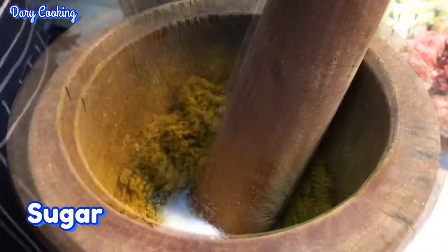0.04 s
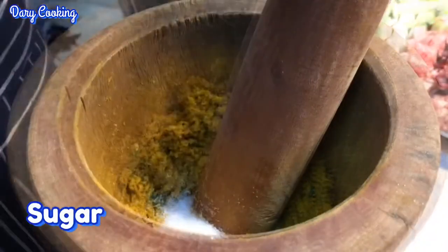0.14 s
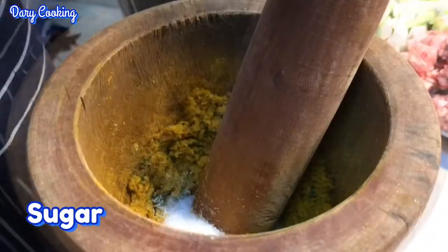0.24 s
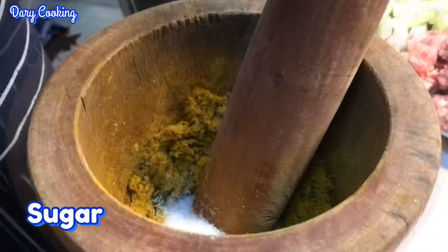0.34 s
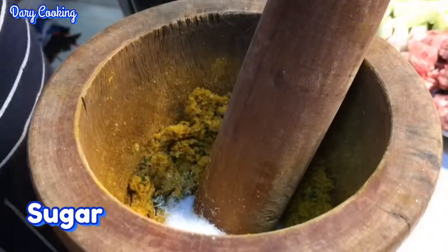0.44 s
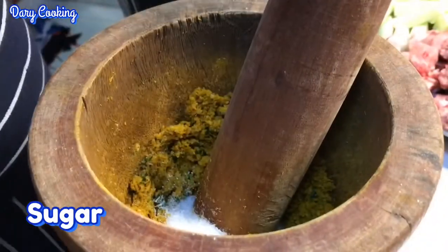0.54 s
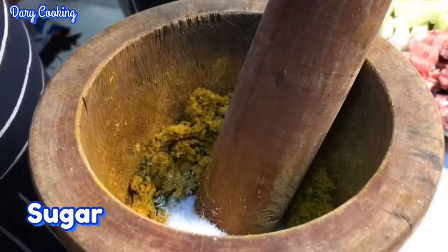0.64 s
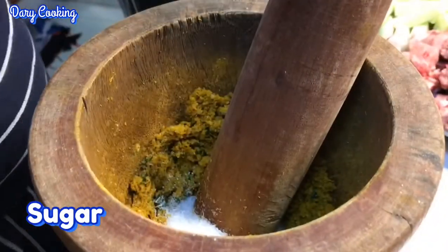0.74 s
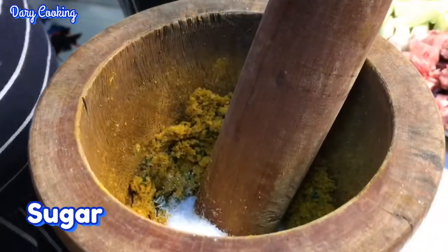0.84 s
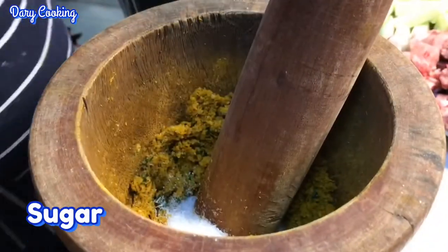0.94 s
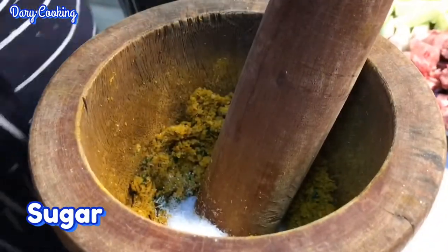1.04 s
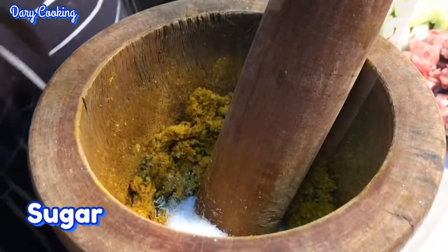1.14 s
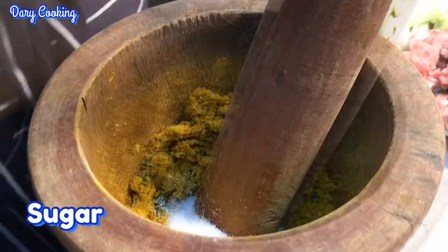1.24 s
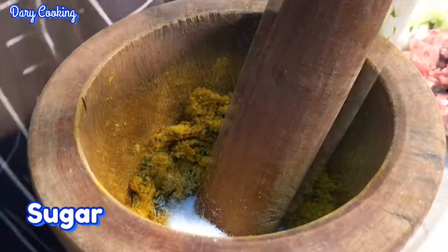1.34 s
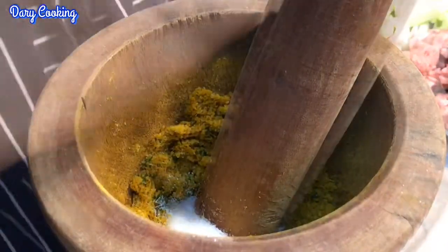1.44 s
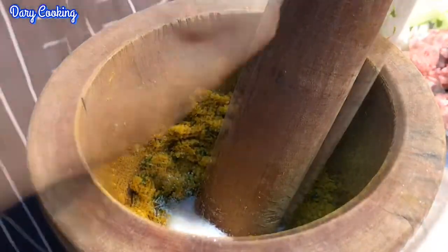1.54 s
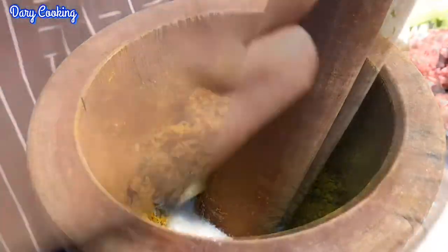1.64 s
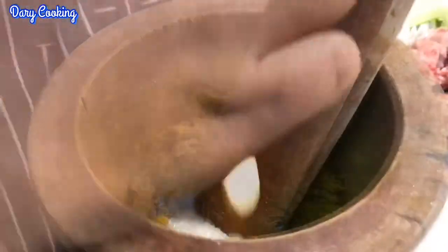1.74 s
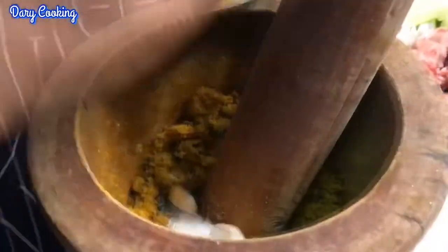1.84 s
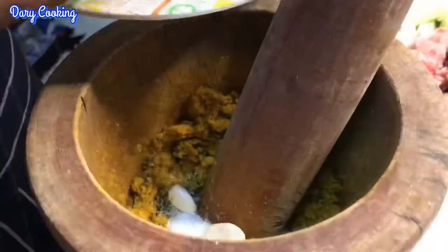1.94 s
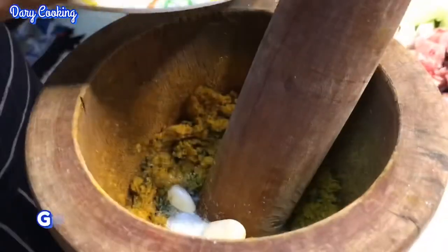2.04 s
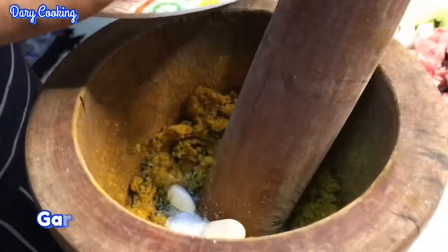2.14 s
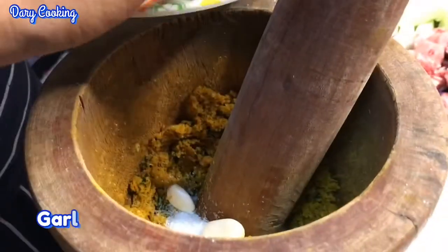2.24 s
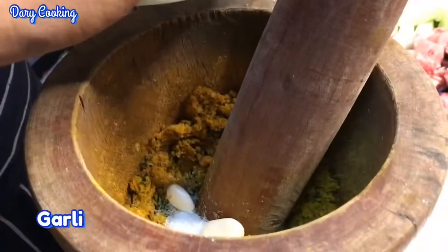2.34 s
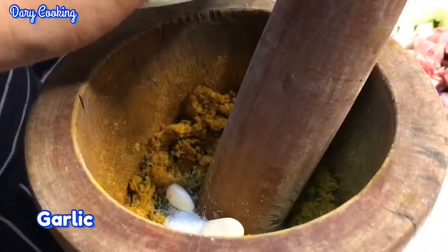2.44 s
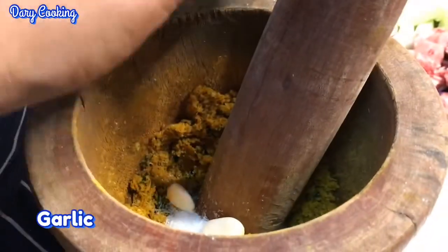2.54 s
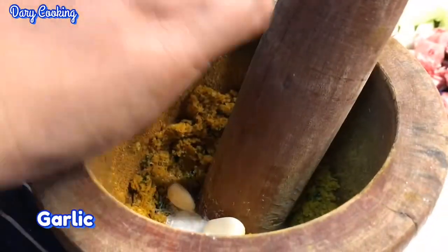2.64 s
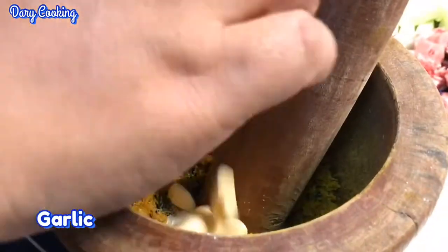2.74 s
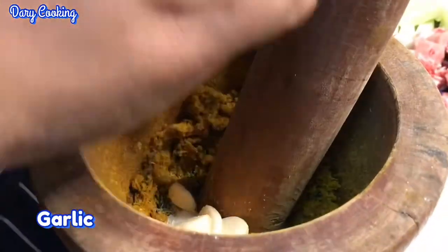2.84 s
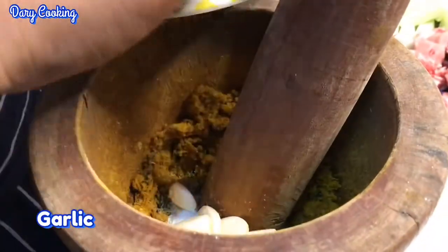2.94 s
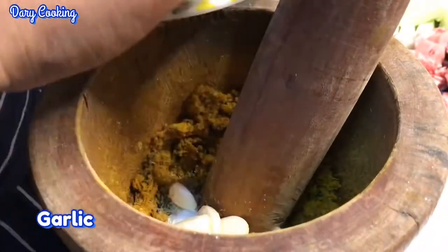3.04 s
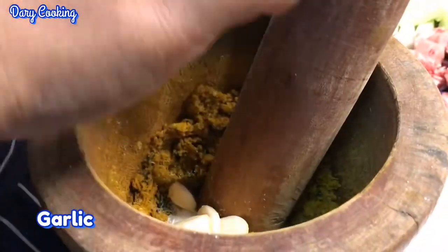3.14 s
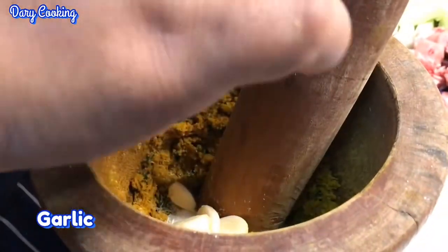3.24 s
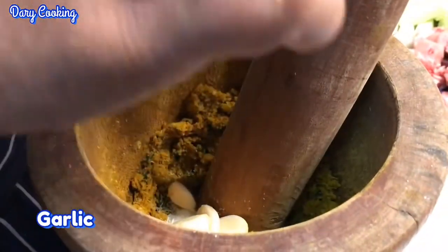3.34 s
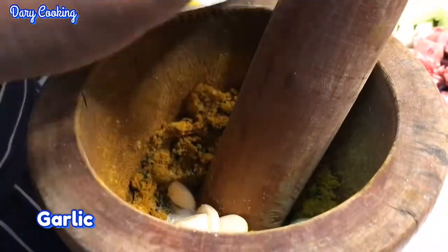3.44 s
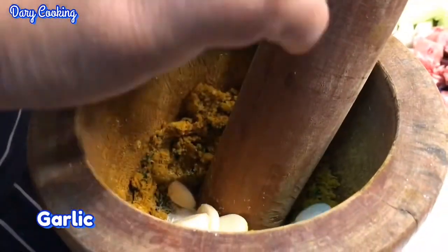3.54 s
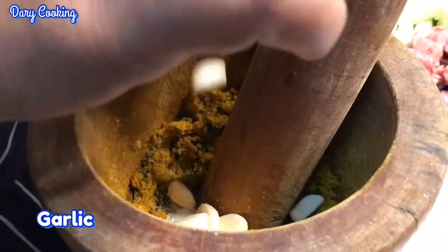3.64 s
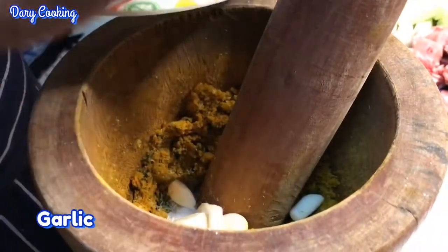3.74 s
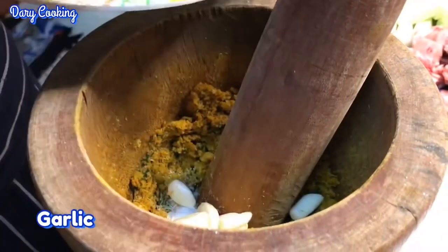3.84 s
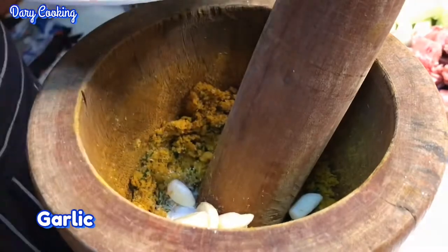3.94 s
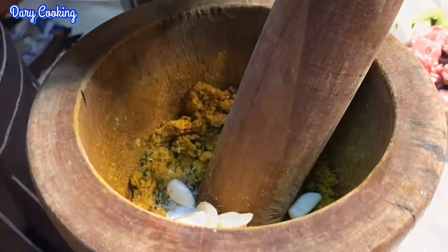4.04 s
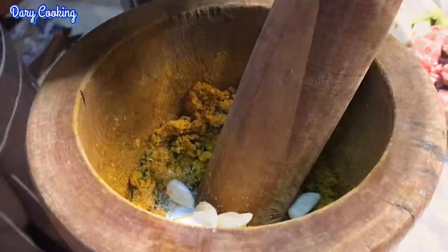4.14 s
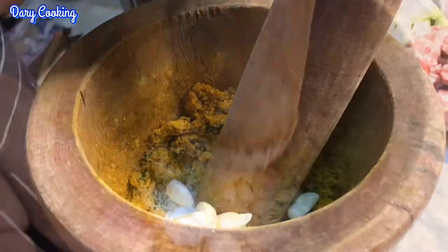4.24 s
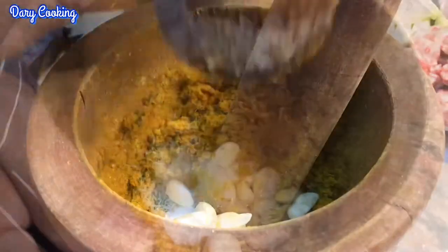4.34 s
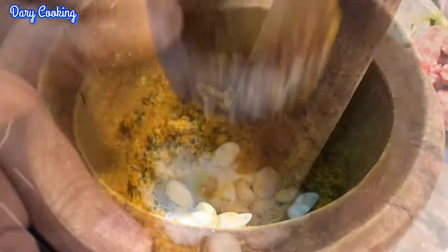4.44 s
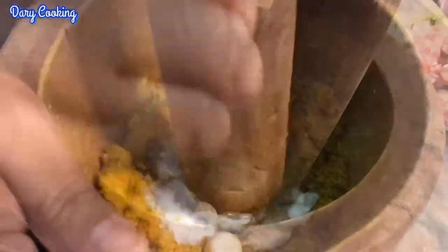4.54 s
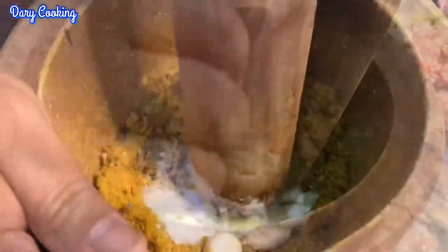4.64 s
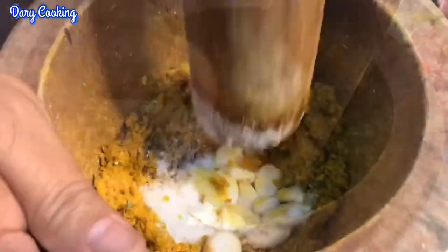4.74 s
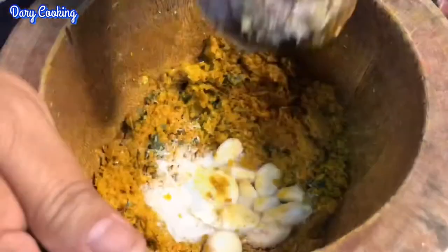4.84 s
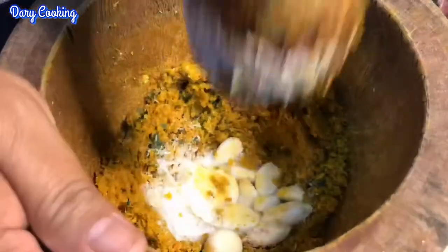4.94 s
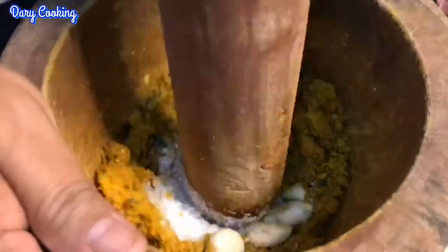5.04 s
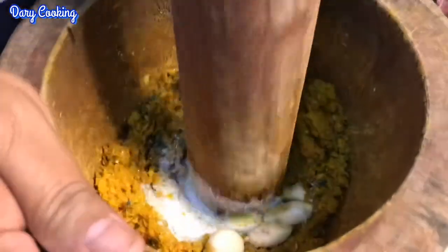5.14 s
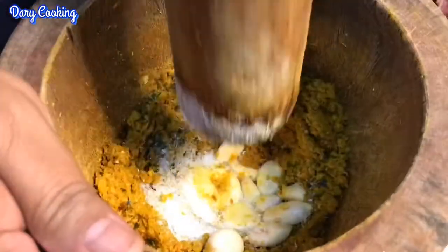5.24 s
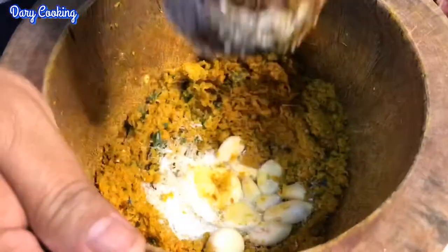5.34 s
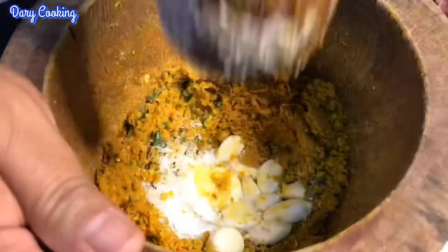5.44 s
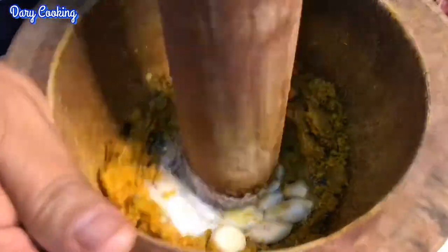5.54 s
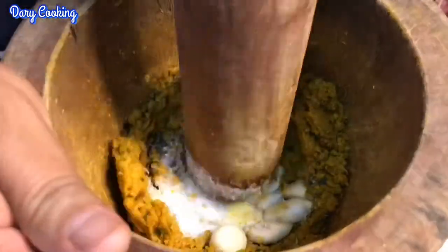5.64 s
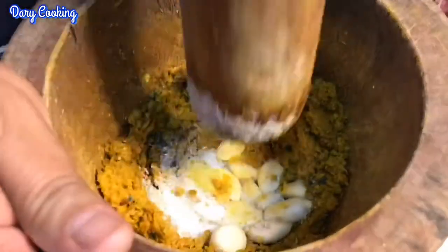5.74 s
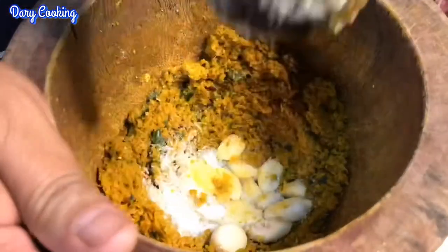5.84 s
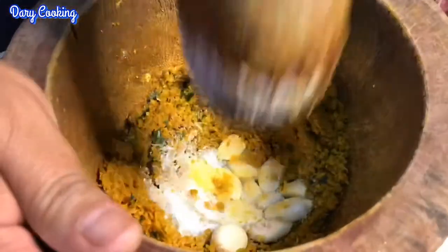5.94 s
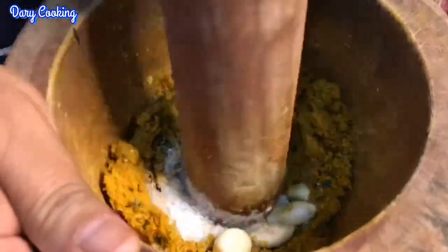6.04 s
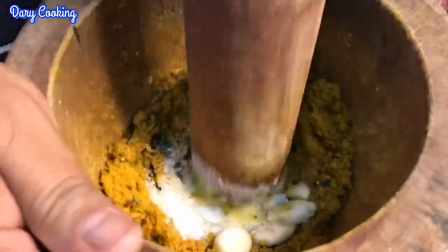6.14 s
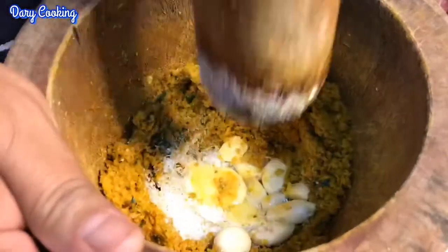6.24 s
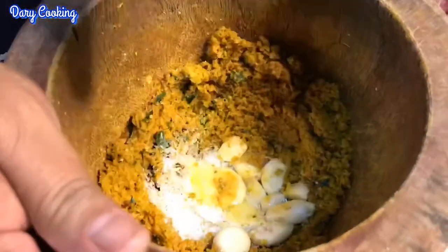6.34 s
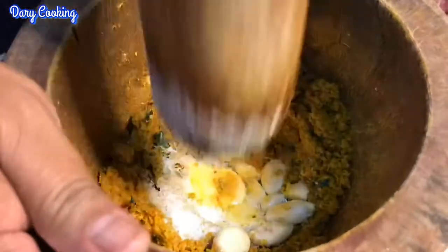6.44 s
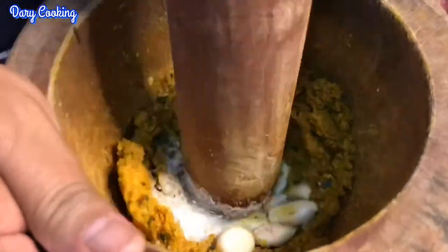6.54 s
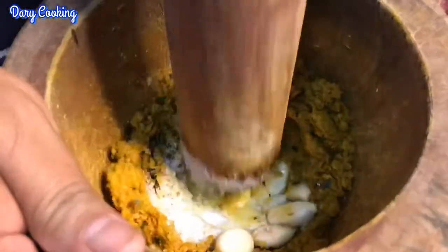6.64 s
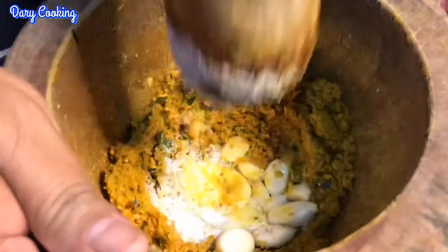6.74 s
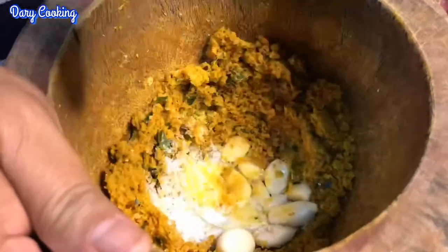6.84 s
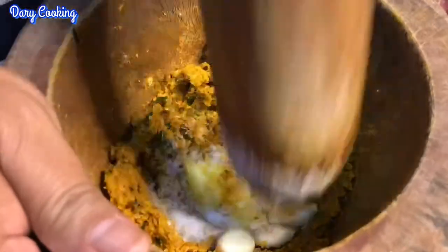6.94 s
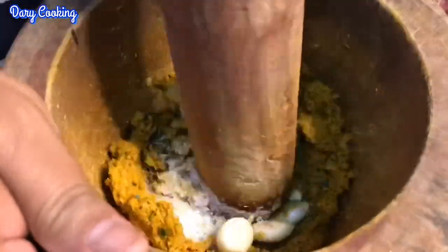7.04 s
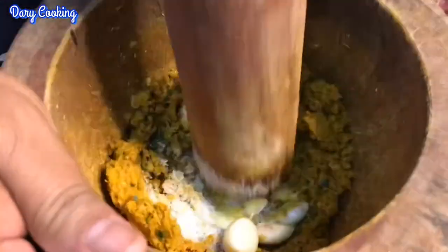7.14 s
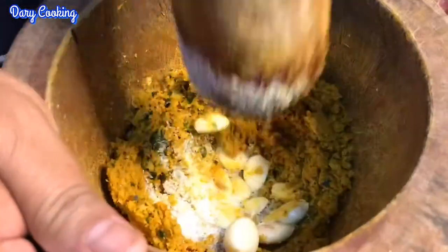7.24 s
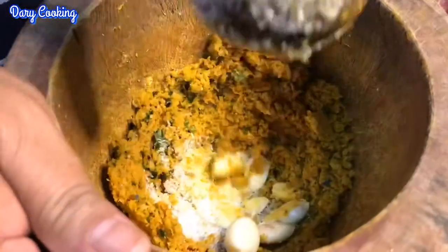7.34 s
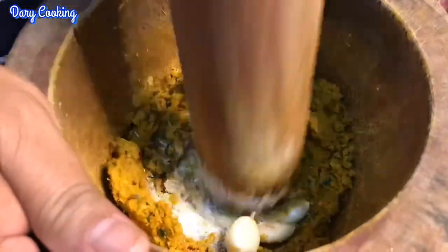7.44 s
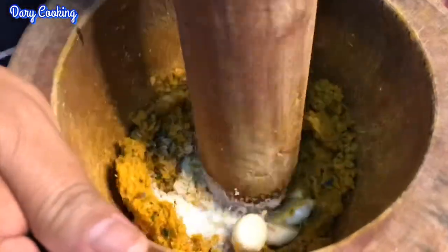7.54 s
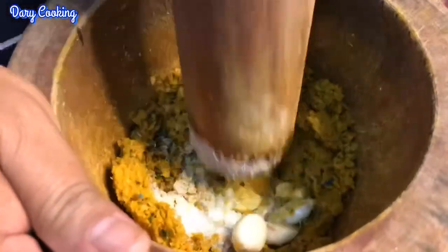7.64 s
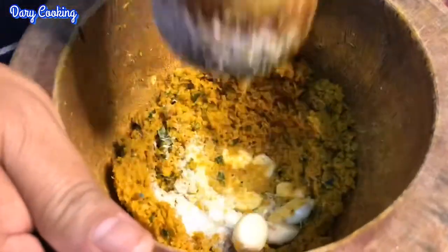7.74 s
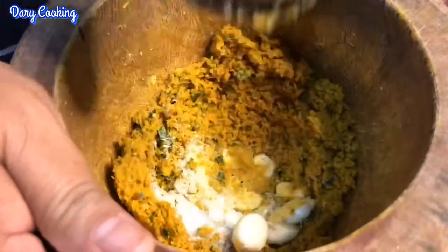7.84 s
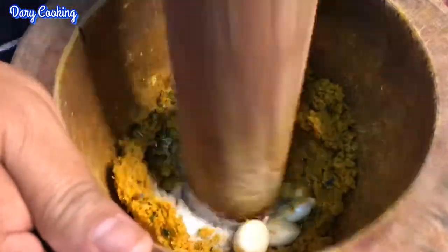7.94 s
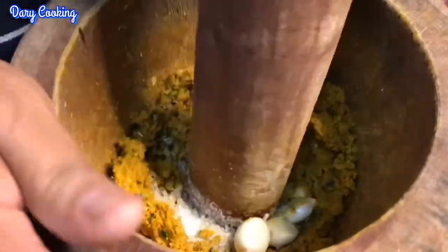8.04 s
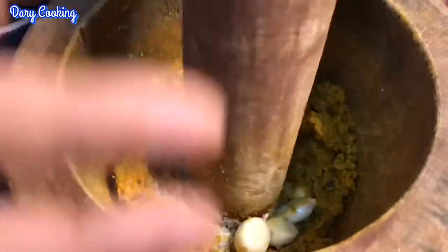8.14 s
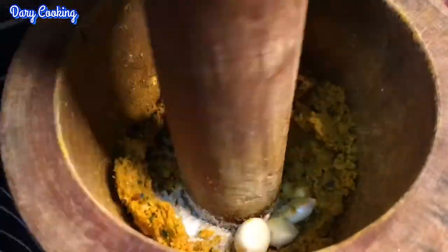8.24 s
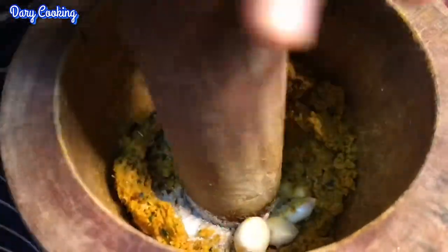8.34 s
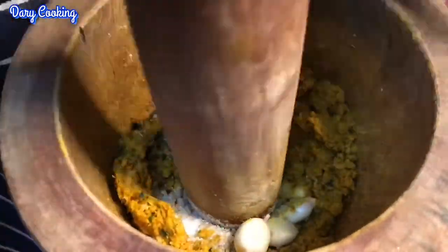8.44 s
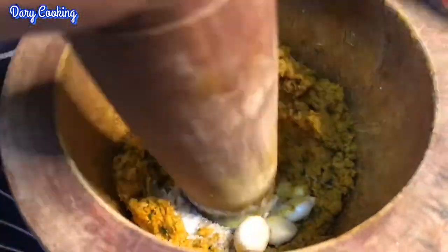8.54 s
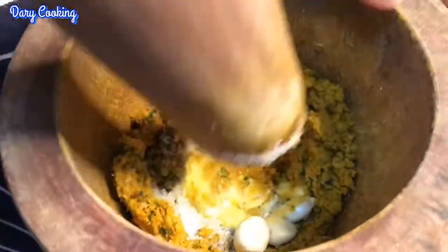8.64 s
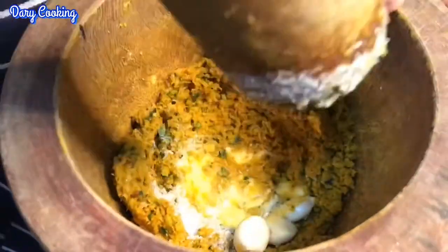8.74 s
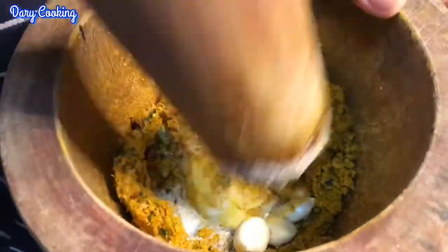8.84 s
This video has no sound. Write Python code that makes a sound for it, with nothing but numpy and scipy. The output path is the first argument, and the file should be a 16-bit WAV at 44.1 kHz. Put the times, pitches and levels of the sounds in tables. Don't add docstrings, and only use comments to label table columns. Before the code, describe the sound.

Phone close to a mortar on a kitchen floor, low room tone behind. First a bright spoon clink and a short hard plate clatter, followed by sparse quiet taps and little knocks. From the middle, eight regular heavy wooden blows crunch through moist paste, thud and bounce off the walls while metal rattles briefly. The sixth is glancing and duller. The pestle then scrapes lightly and strikes once more, hardest.

```python
import sys
import numpy as np
from scipy import signal
from scipy.fft import rfft, irfft, next_fast_len
from scipy.io import wavfile
from scipy.ndimage import uniform_filter1d, map_coordinates

SR = 44100
rng = np.random.default_rng(int(sys.argv[2]) if len(sys.argv) > 2 else 0)


def put_to_file(sound):
    columns = np.atleast_2d(sound).T
    safe = np.clip(columns, -1, 1)
    whole_steps = np.round(safe * 32767)
    wavfile.write(sys.argv[1], SR, whole_steps.astype(np.int16))


def how_loud(loudness_db):
    steps = np.asarray(loudness_db, float) / 20
    return 10 ** steps


N = 392490


def unit(x):
    return x / np.sqrt(np.mean(x ** 2) + 1e-20)


def along(points, hz):
    f, value = np.transpose(points)
    return np.interp(np.log(hz + 1), np.log(f + 1), value)


def filtered(x, response):
    m = next_fast_len(len(x) + 2048)
    return irfft(rfft(x, m) * response(np.fft.rfftfreq(m, 1 / SR)), m)[:len(x)]


def noise(n, spectrum):
    return unit(filtered(rng.standard_normal(n), lambda hz: how_loud(along(spectrum, hz))))


def add(track, s, sound):
    part = track[round(s * SR):][:len(sound)]
    part += sound[:len(part)]


def ring(modes, scatter_db, attack=0.00048, flutter_db=0, freedom=0.95):
    hz, db, t60 = np.transpose(modes)[:, :, None]
    t60 = np.clip(np.abs(t60) * freedom, .004, .7)
    t = np.arange(round(.8 * t60.max() * SR)) / SR
    chance = rng.standard_normal((len(modes), 81))
    flutter_times = np.arange(80) / 140
    flutter = np.array([np.interp(t, flutter_times, row[1:]) for row in chance])
    level = how_loud(db + scatter_db * chance[:, :1] + flutter_db * flutter - 60 * t / t60)
    tones = level * np.sin(2 * np.pi * hz * t)
    return tones.sum(0) * (1 - np.exp(-t / attack))


def click(t60, low_hz, high_hz=14000, attack=0.002, order=1):
    t = np.arange(round(min(t60, .14) * SR) + 64) / SR
    band = lambda hz: hz ** 2 / (hz ** 2 + low_hz ** 2) / np.hypot(1, (hz / high_hz) ** order)
    crack = filtered(rng.standard_normal(len(t) + 1024), band)
    return unit(crack)[:len(t)] * how_loud(-60 * t / t60) * (1 - np.exp(-t / attack))


# (frequency [Hz], time to fall 60 dB [s])
KITCHEN_FADE = [(40, 0.73), (110, 1), (280, 0.41), (740, 0.29), (1940, 0.3), (5100, 0.37), (13500, 0.39)]


def reverb(colour, rise, stretch=1):
    hz, t, z = signal.stft(noise(SR, colour), SR, nperseg=512)
    fade = how_loud(-60 * t / stretch / along(KITCHEN_FADE, hz)[:, None])
    tail = signal.istft(z * fade, SR, nperseg=512)[1][:SR]
    u = np.arange(SR) / SR
    tail = tail * np.clip(u / rise, 0, 1) ** 2 * np.clip(5 * (1 - u), 0, 1)
    return tail / np.linalg.norm(tail)


# (thump time [s], thump level [dB], crush length [s], crush level [dB])
BLOWS = [
    (4.4856, -6.5, .0085, -15),
    (4.9884, -2, .0091, -11.5),
    (5.4802, -4, .008, -9.5),
    (5.954, -2.5, .008, -9),
    (6.4380, -3.5, .0095, -10),
    (6.9325, -7, 0.0235, -20),
    (7.4059, -2.5, .0078, -9.5),
    (7.8928, -5, .01, -13),
    (8.8342, 0, .0075, -12.5),
]
# (frequency [Hz], level [dB])
AIR_COLOUR = [(18, -38), (30, -2), (150, -1.5), (289, -7), (313, -6.5), (348, -12.5), (376, -12.5),
              (605, -14.5), (1080, -16), (1270, -19.5), (2380, -21), (4370, -25.5), (13900, -40.5),
              (16300, -38.5)]
# (frequency [Hz], width [Hz], level [dB])
FRIDGE_HUM = [(150, 14, -62), (261, 8, -67), (314, 7, -63), (1017, 10, -74)]


def air():
    room_db, busy_db, busy_fade_s = -50.5, 5, 0.18
    swell_db = 1.3 * map_coordinates(rng.standard_normal(60), [np.arange(N) * 6 / SR])
    t = np.arange(N) / SR
    times = np.array([-9] + [s for s, *_ in BLOWS])
    since = t - times[np.searchsorted(times, t) - 1]
    lift_db = busy_db * np.exp(-since / busy_fade_s)
    tone = how_loud(room_db + lift_db + swell_db) * noise(N, AIR_COLOUR)
    for centre_hz, width_hz, db in FRIDGE_HUM:
        line = filtered(rng.standard_normal(N), lambda hz: 1 / np.hypot(1, 2 * (hz - centre_hz) / width_hz) ** 2)
        tone = tone + how_loud(db) * unit(line)
    return tone


# (time [s], level
# [dB], pitch [Hz], time to fall 60 dB [s])
TICKS = [(0.9505, -17.5, 5840, 0.0105), (.960, -34, 5800, .012), (1.189, -33, 3000, .014),
         (1.2, -35, 6000, .015), (1.705, -50, 6000, 0.026), (1.733, -43, 6000, .015),
         (1.733, -46, 3700, .015), (1.784, -44, 5200, .012), (2.51, -52, 5500, .03),
         (3.285, -42, 5300, .012), (3.295, -49, 5900, .012), (3.667, -46, 5500, .015),
         (3.666, -39.5, 2200, 0.017), (3.035, -43, 2200, .012), (.822, -36, 3200, 0.037),
         (0.862, -32, 2200, 0.014), (.855, -40, 3200, .04), (6.9155, -11, 2370, 0.023),
         (6.927, -18, 3000, 0.017), (7.046, -35, 3830, 0.018)]


def ticks():
    out = np.zeros(N)
    for s, db, hz, t60 in TICKS:
        add(out, s, how_loud(db) * click(t60=t60, low_hz=hz * 1.2, high_hz=hz * 1.1, attack=.0005, order=6))
    return out


# (time [s], level [dB], click level [dB])
HOLLOW_KNOCKS = [(0.866, -33, -40), (1.189, -37.5, -41), (1.24, -40.5, -65), (1.333, -34.5, -50),
                 (1.62, -72, -41), (1.701, -63, -37.5), (1.781, -47, -49), (3.035, -47, -47.5),
                 (3.334, -51, -60.5), (4.014, -40, -43), (8.346, -51, -61), (8.415, -53.5, -49),
                 (8.626, -49, -57)]
# (time [s], level [dB], click level [dB])
RIM_KNOCKS = [(0.045, -33.5, -29.5), (0.855, -24, -35), (0.862, -21.5, -31), (0.891, -25, -34),
              (1.733, -36.5, -41), (1.855, -32, -64), (1.869, -43, -59), (2.699, -34.5, -33.5),
              (2.755, -41, -37), (3.284, -39, -45), (3.468, -36.5, -57), (7.876, -27, -24.5)]
# (time [s], level [dB], pitch [Hz], click level [dB])
TAPS = [(0.821, -30, 2120, -27), (0.955, -29, 626, -20.5), (0.825, -29, 470, -18), (1.33, -42, 490, -40),
        (2.119, -34.5, 1246, -60), (2.19, -50, 1140, -45), (2.434, -42, 1133, -58), (2.675, -38, 1310, -44),
        (2.692, -33.5, 1456, -31), (0.862, -19, 2190, -50), (0.895, -40, 2300, -55),
        (1.337, -36, 2120, -60), (1.337, -37, 1004, -62), (2.078, -48, 1580, -59), (2.755, -44, 1450, -57),
        (2.884, -50, 1650, -50), (3.083, -55, 770, -47), (2.515, -50, 1100, -58), (3.128, -45, 2380, -60),
        (3.473, -47, 2340, -59), (3.51, -51, 1037, -61), (3.51, -46, 1550, -62), (3.509, -46, 2360, -66),
        (3.666, -43, 1470, -47), (3.986, -26.5, 1500, -33), (8.206, -53, 1520, -43),
        (8.286, -56, 1520, -40), (8.525, -51, 1110, -59), (8.574, -57, 1550, -51)]
# (time [s], level [dB], top frequency [Hz])
THUDS = [
    (0.828, -32, 2500),
    (0.862, -38, 3000),
    (0.893, -38, 2500),
    (1.333, -35, 3500),
    (1.857, -26, 900),
    (3.981, -34, 900),
    (4.0, -43, 4000),
    (4.02, -36, 500),
]
# (time [s], level [dB], pitch [Hz], time to fall 60 dB [s])
RINGS = [(0.808, -36, 540, .1), (0.824, -22, 520, .1), (0.838, -29, 560, .08), (1.336, -31, 345, .1),
         (2.435, -42, 1550, .05), (2.122, -48, 3650, .06), (2.124, -48, 5150, .05), (2.121, -36, 1600, .09),
         (.893, -29, 580, .07), (.856, -29, 620, .07), (1.733, -42, 1400, .03), (3.472, -56, 5500, .1),
         (3.49, -51, 1650, .06), (0.866, -38, 350, .08), (0.953, -40, 9970, .4), (0.546, -50, 3170, .04),
         (0.955, -25, 615, .15), (1.19, -38, 340, .12), (1.19, -41, 680, .09), (1.29, -46, 620, .1),
         (.299, -33, 9370, .3), (1.335, -42, 560, .15), (7.03, -46, 2478, .3), (.25, -29, 13830, .4),
         (.32, -32, 13830, .22), (.22, -35, 624, .28), (.31, -41, 15040, .4), (.25, -43, 5020, .5),
         (.22, -42, 7490, .4), (8.0, -45, 2478, .3), (8.203, -43, 1560, .17), (8.574, -51, 1550, .1)]
# (time [s], level [dB], pitch [Hz])
BUMPS = [
    (3.557, -34, 67),
    (3.939, -36, 100),
    (3.994, -26.5, 65),
    (4.02, -43, 70.5),
    (4.05, -33.5, 176),
    (4.131, -43.5, 106),
    (6.9487, -18.5, 107),
    (8.807, -31, 110),
]


def knocks():
    out = np.zeros(N)
    rows = [(s, db, 330, 0.064, click_db) for s, db, click_db in HOLLOW_KNOCKS]
    rows += [(s, db, 595, 0.03, click_db) for s, db, click_db in RIM_KNOCKS]
    for s, db, hz, click_db in TAPS:
        cycles = 23.3 - 1.8 * (db + 19)
        rows.append((s, db, hz, cycles / hz, click_db))
    for s, db, hz, t60, click_db in rows:
        wood = [(hz, 0, t60), (hz * 0.62, -8, t60), (hz * 2.1, -9, t60 * 0.33), (hz * 4.5, -17, t60 * 0.33)]
        scuff = click(t60=t60 * 1.06, low_hz=hz * 1.2, high_hz=hz * 3.5, attack=0.00077, order=2)
        add(out, s, how_loud(db + 2.5) * ring(wood, scatter_db=4.0, attack=0.0014, flutter_db=3.0))
        add(out, s, how_loud(db - 7.0) * scuff)
        add(out, s, how_loud(click_db + 1) * click(t60=0.014, low_hz=3476, attack=0.00087))
    for s, db, top_hz in THUDS:
        add(out, s, how_loud(db) * click(t60=0.058, low_hz=266, high_hz=top_hz, attack=0.0024, order=2))
    for s, db, hz, t60 in RINGS:
        add(out, s, how_loud(db) * ring([(hz, 0, t60)], scatter_db=0, attack=0.0028, flutter_db=1.5))
    for s, db, hz in BUMPS:
        body = [(hz, 0, .08), (hz * 1.71, -5, .12), (hz * 1.18, -8, .1)]
        add(out, s, how_loud(db) * ring(body, scatter_db=-4.5, attack=0.0024, flutter_db=-1))
    return out


# (frequency [Hz], level [dB], time to fall 60 dB [s], part [0 belly to 3 rim])
PLATE_TONES = [(600, 0, .035, 0), (1050, -14, .05, 0), (1540, -3, .05, 1), (1640, -6, .07, 1),
               (2170, 0, .06, 1), (2460, -12, .07, 2), (2750, -4, .04, 2), (3160, -12, .05, 2),
               (3515, -9, .04, 3), (3860, -5, .02, 3), (4450, -13, .04, 3), (720, -6, .05, 0),
               (4080, -8, .02, 3)]
# (time [s], belly level [dB], middle level [dB], shoulder level [dB], rim level [dB])
PLATE_HITS = [
    (0.7299, -27, -11, -7, -13.5),
    (0.7325, -11, -26, -24, -29.5),
    (0.7389, -38.5, -9, -17, -3.5),
    (0.7435, -35, -15, -15, -14),
    (0.7504, -18.5, -19.5, -22, -12.5),
]


def plate():
    out = np.zeros(N)
    for s, *part_db in PLATE_HITS:
        modes = [(hz, db + part_db[part], t60) for hz, db, t60, part in PLATE_TONES]
        buzz = click(t60=0.081, low_hz=1500, high_hz=3800, order=8)
        rim_crack = click(t60=0.033, low_hz=2400, high_hz=4350, order=6)
        add(out, s, ring(modes, scatter_db=1, flutter_db=4, freedom=0.55))
        add(out, s, how_loud(part_db[1] - 19) * buzz)
        add(out, s, how_loud(part_db[-1] - 6.5) * rim_crack)
    return filtered(out, lambda hz: 1 / np.hypot(1, (400 / (hz + 1)) ** 4))


# (frequency [Hz], level [dB], time to fall 60 dB [s])
SPOON_STEM = [(624, -20, .2), (1384, -30, .4), (2300, -18, .03), (3900, -26, .15), (5020, -29, .6),
              (4630, -33, .4), (6148, -26, .1), (6403, 0, .065), (6410, -15, .7), (7490, -21, .2),
              (8274, -26, .3), (9160, -19, .13), (10490, -8, .016), (11720, -10, .06), (15060, -9, .01)]
SPOON_BOWL = [(3158, 0, .04), (3110, -24, .35), (8280, -16, .05), (8440, -16, .04), (9965, -1, .04),
              (9152, -19, .13), (9860, -24, .2), (11855, -16, .09), (15480, -18, .02)]
SPOON_TIP = [(13830, -4, .1), (15040, -15, .15), (9370, -29, .4), (13450, -22, .15), (11730, -11, .25)]
# (time [s], click level [dB], stem level [dB], bowl level [dB])
SPOON_IN_CUP = [(.130, -48.5, -63.5, -71.5), (.1556, -18, -11, -48), (.1911, -13, -37, -13.5),
                (.219, -28, -29, -39), (.247, -39, -36, -56.5), (.2579, -18, -28, -14.5),
                (.2998, -28.5, -45, -25.5), (.331, -24.5, -35, -33), (.363, -29, -47, -38),
                (.425, -46.5, -57, -45), (.473, -48, -56, -43), (.511, -54, -70, -59),
                (.5458, -56, -62, -62.5), (.583, -48, -69.5, -72)]
SPOON_ON_PLATE = [(.7977, -14, -40, -13.5), (.8235, -32.5, -50, -15), (.8285, -30, -44, -23),
                  (.8625, -47, -54, -29), (.936, -32, -54, -47), (.9518, -25.5, -40, -24),
                  (.960, -26.5, -45, -56), (1.200, -38, -44, -34), (1.335, -52, -47, -38)]


def spoon():
    out = np.zeros(N)
    places = ((SPOON_IN_CUP, 0.95, 4, 0), (SPOON_ON_PLATE, 0.32, 3, -3.5))
    for contacts, freedom, lift_db, tilt_db in places:
        for s, click_db, stem_db, bowl_db in contacts:
            add(out, s, how_loud(click_db) * click(t60=0.014, low_hz=4000, attack=.0007))
            add(out, s, how_loud(click_db - 17) * click(t60=.16 * freedom, low_hz=4200, attack=.002))
            tip_db = 1.23 * click_db + lift_db
            for db, part in ((stem_db, SPOON_STEM), (bowl_db, SPOON_BOWL), (tip_db, SPOON_TIP)):
                modes = [(hz, level + tilt_db * np.log2(hz / 8000), t60) for hz, level, t60 in part]
                add(out, s, how_loud(db) * ring(modes, scatter_db=1.2, flutter_db=4, freedom=freedom))
    return out


# (peak time [s], level [dB], rise [s], fade [dB per s])
STROKES = [
    (8.052, -55, .012, 450),
    (8.212, -45, 0.13, 140),
    (8.3, -51, .03, 200),
    (8.38, -56, .02, 200),
    (8.417, -48, 0.0049, 600),
    (8.462, -52, 0.025, 200),
]
# (frequency [Hz], level [dB])
RUB_COLOUR = [(710, -56), (1200, -18), (1560, -6), (2100, -12.5), (14500, -16.5), (16000, -16),
              (16500, -53)]
# (time [s], level [dB], pitch [Hz])
STICKY_TICKS = [
    (8.289, -50, 6000),
    (8.3, -46, 6000),
    (8.315, -49, 9000),
    (8.35, -35, 7040),
    (8.417, -35, 6800),
    (8.525, -52, 12000),
    (8.574, -44, 9000),
    (8.628, -45, 9800),
    (8.822, -29, 11800),
]


def rub():
    out, t = np.zeros(N), np.arange(SR // 2) / SR
    for s, db, rise, fade in STROKES:
        z = signal.stft(noise(len(t), RUB_COLOUR), nperseg=256)[2]
        patches = uniform_filter1d(rng.standard_normal(z.shape), size=8, axis=0)
        patches = uniform_filter1d(patches, size=20, axis=1)
        hiss = signal.istft(z * how_loud(2.9 * unit(patches)), nperseg=256)[1][:len(t)]
        grain = how_loud(1.2 * unit(uniform_filter1d(rng.standard_normal(len(t)), size=150)))
        stroke = np.clip(t / rise, 0, 1) ** 2 * how_loud(db + 2.0 - fade * np.clip(t - rise, 0, 1))
        add(out, s - rise, stroke * unit(grain * hiss))
    for s, db, hz in STICKY_TICKS:
        add(out, s, how_loud(db) * click(t60=.012, low_hz=hz * .8, high_hz=hz * 1.2, attack=.0006, order=2))
    return out


DISH_HZ = [2476, 3540, 4665, 5915, 6578, 7362, 8134, 8963, 10020, 10720, 12610, 14700]
# (level [dB], time to fall 60 dB [s])
DISH_TONES = [(-4.5, 0.086), (4.5, 0.099), (1.5, 0.07), (5, 0.1), (-8, .08), (-1.5, 0.084), (-19, .08),
              (-2, .12), (-12, .08), (-19, .12), (-12, 0.14), (-11, 0.048)]
# (time [s], first tone level [dB], second level
# [dB], third level [dB], upper tones level [dB])
CHATTER = [(4.494, -41, -52, -53, -37), (4.506, -42, -42, -54, -47), (4.526, -39, -52, -51, -47),
           (4.558, -42, -51, -61, -63), (5.009, -32, -28.5, -52, -29.5), (5.027, -27, -35, -53, -46),
           (5.035, -31, -35, -32, -33.5), (5.051, -43, -41, -56, -47), (5.499, -39, -32, -29, -34),
           (5.523, -34, -30.5, -33, -36), (5.537, -32, -48, -48, -54), (5.561, -40.5, -49, -53, -61),
           (5.975, -40, -36, -36, -46), (5.989, -37, -32, -38, -32), (6.013, -41, -56, -58, -38.5),
           (6.019, -32, -45, -57, -55), (6.459, -33, -37, -28, -30), (6.481, -32, -30.5, -29.5, -33.5),
           (6.495, -44, -42, -46, -54), (6.527, -40, -57, -60, -60), (6.955, -29, -31, -32, -31.5),
           (6.977, -32, -43, -52, -50), (6.993, -52, -34.5, -47, -42), (7.019, -49, -55, -67, -54),
           (7.045, -66, -68, -55, -58), (7.357, -67, -66, -70, -74), (7.429, -39, -31, -25.5, -32),
           (7.445, -40, -36, -45, -41), (7.457, -46, -43, -40, -33), (7.465, -40, -39, -54, -44),
           (7.914, -35, -37, -49, -31.5), (7.93, -24, -43, -36, -41), (7.952, -30, -42, -53, -51),
           (7.974, -36, -66, -62, -56), (8.843, -36, -50, -41, -32), (8.855, -40, -28, -30, -34),
           (8.875, -34, -41, -48, -34), (8.885, -41, -39.5, -35, -43),
           (6.938, -43, -36, -38, -35),
    (7.904, -50, -43, -55, -57),
]


def dish():
    out = np.zeros(N)
    grip_s, grip_t60 = .06, .012
    rocking = [(7.1145 + k * 0.0343, -66, -55.5, -64, -65) for k in range(4)]
    contacts = sorted(map(tuple, [*CHATTER, *rocking]))
    for (s, *spot_db), (next_s, *_) in zip(contacts, contacts[1:] + [(np.inf,)]):
        levels = np.r_[spot_db, np.full(len(DISH_TONES) - len(spot_db), spot_db[-1])]
        modes = [(hz, db + level, t60) for hz, (db, t60), level in zip(DISH_HZ, DISH_TONES, levels)]
        sound = how_loud(3) * ring(modes, scatter_db=1, attack=0.0008, flutter_db=3, freedom=1.6)
        if next_s - s < grip_s:
            gripped = np.clip(np.arange(len(sound)) / SR - (next_s - s), 0, 1)
            sound = sound * how_loud(-60 * gripped / grip_t60)
        else:
            free = [(hz, db - 14, .4) for hz, db in zip(DISH_HZ, spot_db)]
            add(out, s, ring(free, scatter_db=2, attack=.01, flutter_db=5))
        add(out, s, sound)
        add(out, s, how_loud(np.mean(spot_db[1:]) + 7.5) * click(t60=0.045, low_hz=2600, attack=0.00127))
    return out


def push(hz, width):
    t = np.arange(-441, 882) / SR
    return -np.exp(-.5 * ((t - .0004) / width) ** 2) * np.cos(2 * np.pi * hz * t)


# (frequency [Hz], level [dB])
PASTE_COLOUR = [(350, -19), (600, 0), (948, -5), (1980, -4.5), (6890, -10), (10400, -14), (11800, -15),
                (15200, -13.5), (16500, -73)]


def crush_paste(thump_db, length, crush_db, squeak_hz, squeak_db):
    low_hz = 300 * 2 ** (0.46 * thump_db)
    u = np.arange(round(.06 * SR)) / SR
    peak = length - .0036
    rise = min(.8 * peak, .006)
    squeeze = np.where(u < rise, (u / rise) ** 1.6, np.exp(-np.clip(u - peak, 0, 1) / 0.0017))
    grit = how_loud(2 * unit(uniform_filter1d(rng.standard_normal(len(u)), size=20)))
    squeak = lambda hz: how_loud(squeak_db * np.exp(-((hz - squeak_hz) / 420) ** 2))
    paste = filtered(noise(len(u), PASTE_COLOUR), lambda hz: hz ** 2 / (hz ** 2 + low_hz ** 2) * squeak(hz))
    return how_loud(crush_db) * squeeze * unit(grit * paste)


# (squeak pitch [Hz], squeak level [dB], wood level [dB], echo level [dB], thump pitch [ratio])
LANDINGS = [
    (2200, 4, -1, 1, 0.85),
    (2060, 6.5, 1, 0.5, .98),
    (1460, 6.5, 0, -3, 0.94),
    (2200, 3.5, 1, 0, .98),
    (1500, 3.5, 1.5, -1, 1.02),
    (2280, -13, -11, -8, 0.7),
    (1500, 4, 0, -1.5, 0.99),
    (3000, 3, 0, -0.5, 0.94),
    (2200, 3, -0.5, 1.5, .98),
]
# (delay [ms], thump level [dB], crush level [dB])
WALLS = [(10.63, -2, -6), (24.7, -5.5, -31), (40.17, -7, -10.5), (44.67, -8, -20), (51.6, -29, -17),
         (64.6, -17, -15)]
# (frequency [Hz], level [dB], time to fall 60 dB [s])
BOARDS = [(63.7, -8.5, 0.17), (78, 3, 0.133), (95.2, -9.5, 0.245), (144, -49, 0.54), (205.4, -14, 0.29),
          (249.4, -6.5, 0.15), (281, -9, 0.24), (337, -14.5, 0.071), (375, -15.5, 0.28), (514.4, -16, 0.17),
          (572, -7.5, 0.15), (700, -24.5, 0.13)]
# (frequency [Hz], level [dB])
TAIL_COLOUR = [(21, -47), (35, -9.5), (102, -6.5), (178, -4.5), (249, -3.5), (618, -10.5), (737, -9.5),
               (1410, -18), (2300, -26), (2990, -30), (5060, -120)]
# (time [s], level [dB], low edge [Hz])
BRUSHES = [
    (6.427, -30, 3000),
    (7.393, -25, 900),
    (7.397, -21, 900),
    (8.822, -30, 6500),
]


def pounding():
    out = np.zeros(N)
    push_hz = np.array([180, 140, 140, 240, 250, 230, 200])
    for (s, thump_db, length, crush_db), landing in zip(BLOWS, LANDINGS):
        squeak_hz, squeak_db, wood_db, echo_db, pitch = landing
        pushes = [push(hz, .41 / hz) for hz in pitch * push_hz]
        crush = crush_paste(thump_db, length, crush_db, squeak_hz, squeak_db)
        dull = filtered(crush, lambda hz: 1 / np.hypot(1, hz / 6000))
        add(out, s - .01, how_loud(thump_db) * pushes[0])
        add(out, s - length, crush)
        for echo, (ms, wall_thump_db, wall_crush_db) in zip(pushes[1:], WALLS):
            glance_db = -4 if wood_db < -4 and ms < 20 else 0
            wall_db = thump_db + wall_thump_db + rng.standard_normal() + glance_db
            add(out, s - .01 + ms / 1000, how_loud(wall_db) * echo)
            add(out, s - length + ms / 1000, how_loud(wall_crush_db + echo_db) * dull)
        room = reverb([(500, 0), (4000, -3), (16000, -5)], rise=.02)[:SR // 3]
        add(out, s - length, how_loud(echo_db - 8.0) * signal.fftconvolve(crush, room))
        boards = ring(BOARDS, scatter_db=1.5, attack=0.0025, flutter_db=3.5)
        add(out, s + 0.0037, how_loud(thump_db + wood_db - 8.5) * boards)
        rattle = click(t60=0.16, low_hz=334, high_hz=866, attack=0.0028)
        add(out, s - .002, how_loud(thump_db + wood_db - 19.0) * rattle)
        tail = reverb(TAIL_COLOUR, rise=0.012) + how_loud(-11) * reverb(TAIL_COLOUR, rise=0.056, stretch=2.6)
        add(out, s, how_loud(19 + thump_db + wood_db / 2) * tail)
    for s, db, low_hz in BRUSHES:
        add(out, s, how_loud(db) * click(t60=.03, low_hz=low_hz, attack=.001))
    return out


def scene():
    small = ticks() + knocks() + plate() + spoon() + dish()
    kitchen = reverb([(100, -11.5), (5000, -13), (16000, -25)], rise=0.0057)
    wet = signal.fftconvolve(small, kitchen)[:N]
    return (air() + small + how_loud(-11.5) * wet + rub() + pounding())[None]


def band_limit(x):
    return signal.sosfilt(signal.butter(12, 17010, fs=SR, output="sos"), x)


def record(dry):
    low_hz, top_hz = 42, 16000
    bass_cut = lambda hz: -hz ** 2 / (low_hz ** 2 - hz ** 2 + 1.4j * hz * low_hz)
    rumble_cut = lambda hz: 1 / np.hypot(1, (38 / (hz + 1)) ** 4)
    treble_cut = lambda hz: 1 / np.hypot(1, (hz / top_hz) ** 40)
    x = filtered(dry[0], lambda hz: bass_cut(hz) * rumble_cut(hz) * treble_cut(hz))
    x = x / (1 + np.abs(x) ** 8) ** (1 / 8)
    return band_limit(x[None])


dry = scene()
out = record(dry)
put_to_file(out)
```